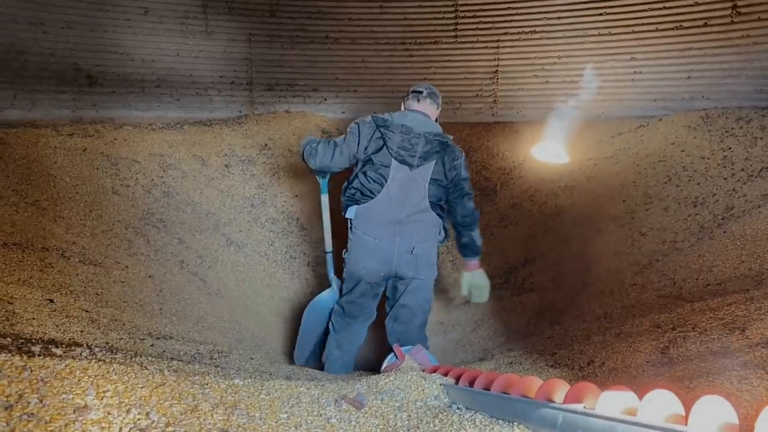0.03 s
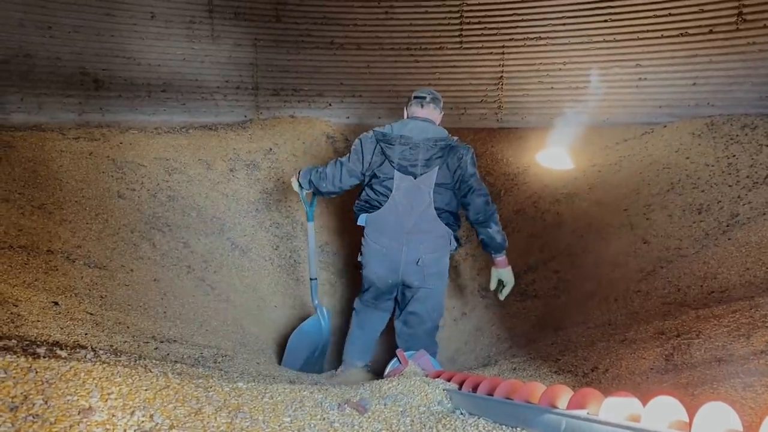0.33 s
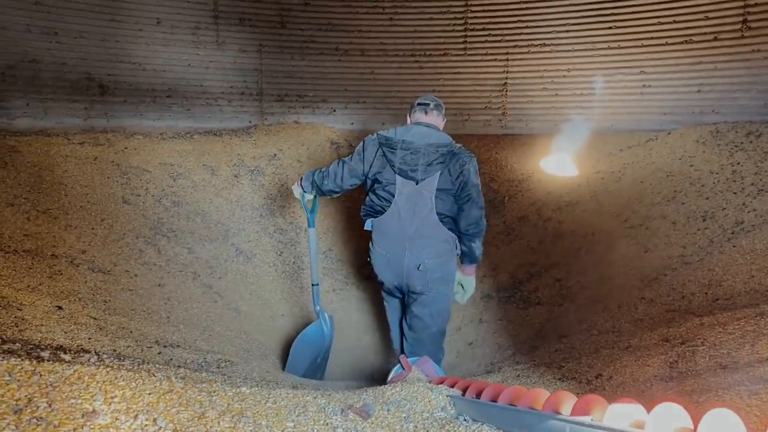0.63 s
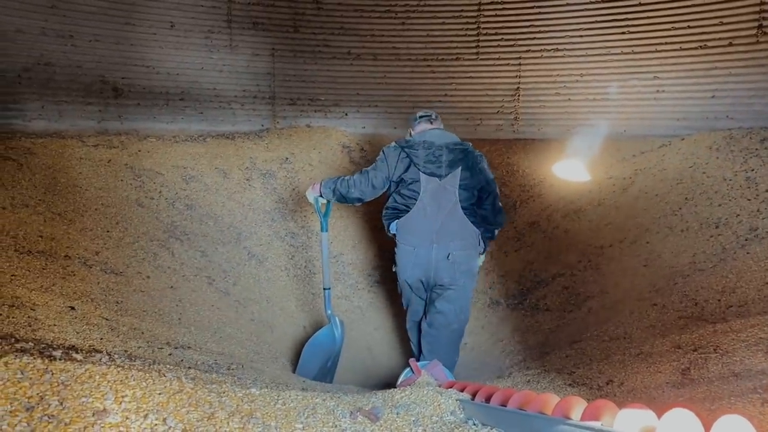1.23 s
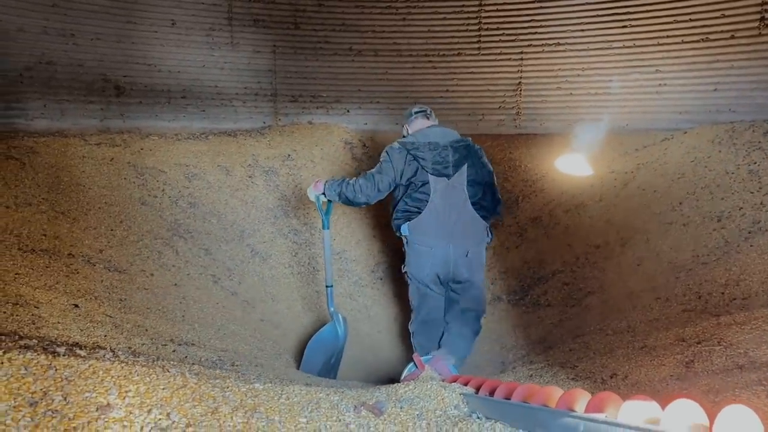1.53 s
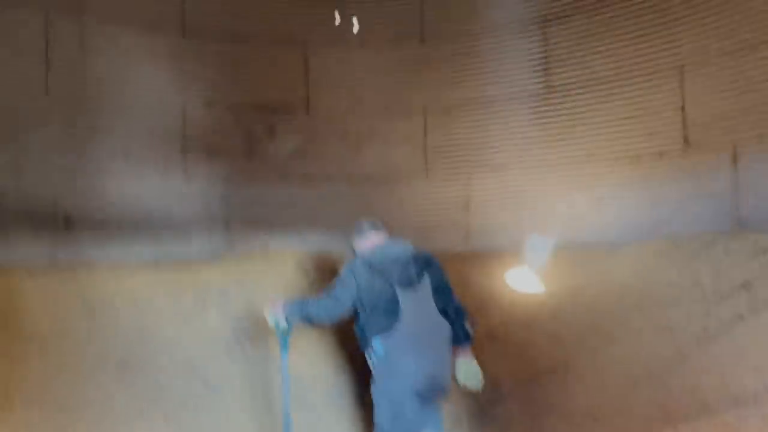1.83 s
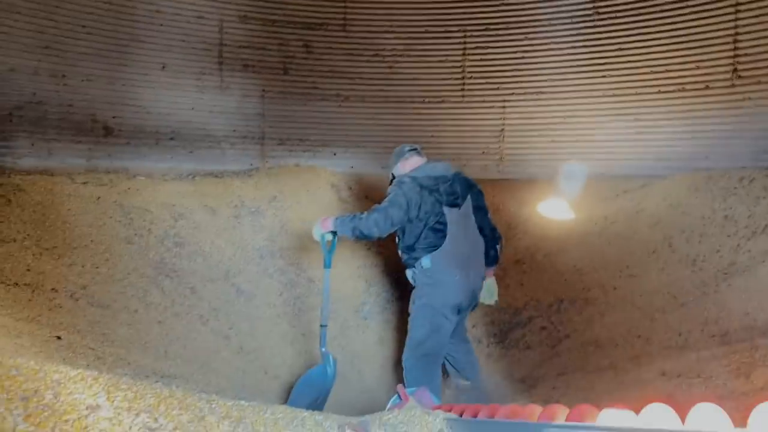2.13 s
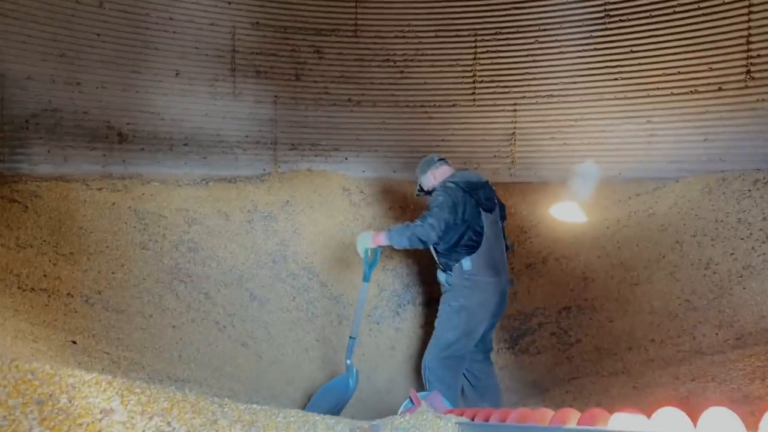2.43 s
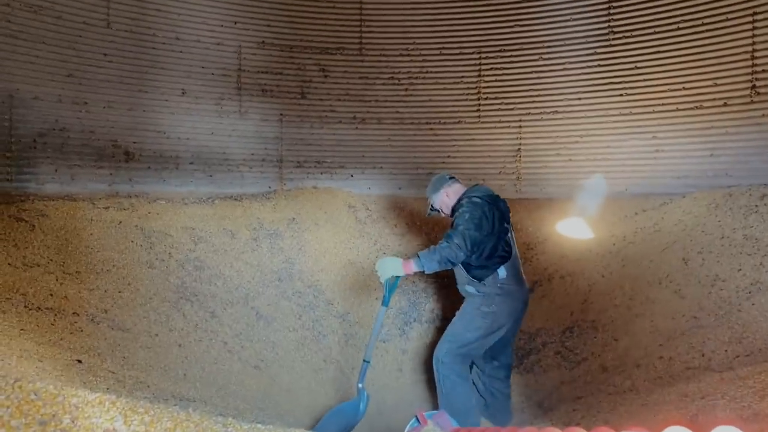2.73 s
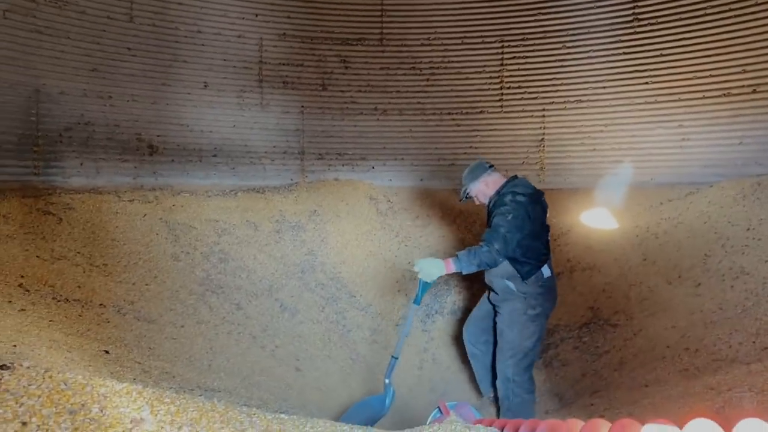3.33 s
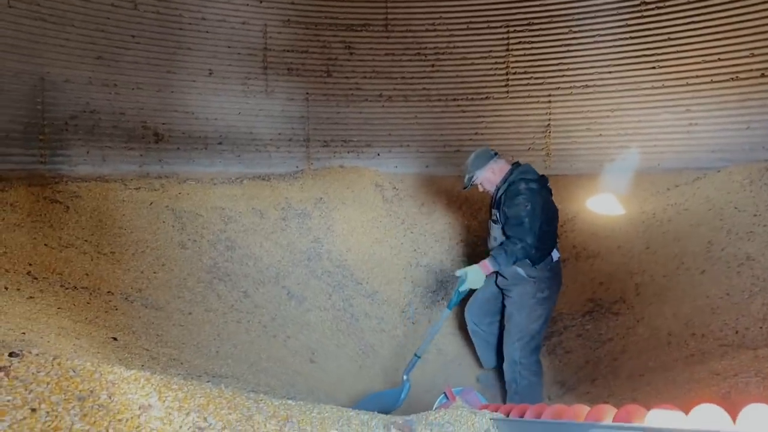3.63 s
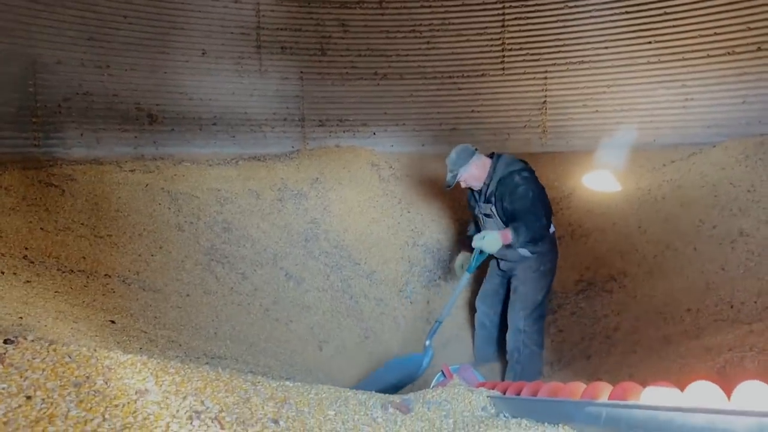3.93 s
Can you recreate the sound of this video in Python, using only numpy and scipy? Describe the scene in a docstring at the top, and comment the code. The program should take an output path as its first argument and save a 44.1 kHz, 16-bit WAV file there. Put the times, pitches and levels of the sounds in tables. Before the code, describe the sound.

Steady roar of a grain auger and droning fans, kernels hissing in an echoing metal bin.

```python
"""Sweep auger and fans in a round steel grain bin.

The fans give a throbbing drone, a low rumble with dull thumps and a broad roar that echoes between
the walls. Drives whine faintly; kernels pushed by the auger hiss and tick. Halfway, a hollow bin
resonance and the auger's rasp swell. The hand-held microphone colours the hiss near 6 kHz; its ports,
the right one most, ring brighter while cupped by the hand."""
import sys
import numpy as np
from scipy.fft import rfft, irfft
from scipy.io import wavfile
from scipy.ndimage import uniform_filter1d

SR = 44100
rng = np.random.default_rng(int(sys.argv[2]) if len(sys.argv) > 2 else 0)


def unload_wav(signal):
    """Save mono or channel-first audio to the path in sys.argv[1] as 16-bit WAV at rate SR, clipped to [-1, 1]."""
    wavfile.write(
        sys.argv[1],
        SR,
        np.round(np.clip(np.atleast_2d(signal).T, -1, 1) * 32767).astype(np.int16),
    )


N = 176400
HZ = np.maximum(np.arange(N // 2 + 1) * SR / N, 1)
RUMBLE_PAN_DB = -1.5

# Stereo field. Each row: frequency in Hz, left-right correlation.
FIELD_CORRELATION = [(60, 0.98), (150, 0.89), (300, 0.78), (600, -1.1), (2400, 0.22), (3200, -0.051),
                     (4300, 0.21), (5200, -0.1), (6200, 0.27), (8700, -0.32), (10000, 0.5), (15000, -0.17)]


def from_db(db):
    """Decibels to gain."""
    return 10 ** (np.asarray(db) / 20)


def rms_one(x):
    """Scale to unit power."""
    return x / np.sqrt(np.mean(x ** 2) + 1e-20)


def in_time(rows):
    """Join (s, value) rows by straight lines."""
    return np.interp(np.arange(N) / SR, *np.transpose(rows))


def over_hz(rows):
    """Interpolate each value column over log frequency."""
    hz, *columns = np.transpose(rows)
    return [np.interp(np.log(HZ), np.log(hz), column) for column in columns]


def shaped(x, gain):
    """Filter by a gain per frequency."""
    return irfft(rfft(x) * gain, N)


def per_hz(db):
    """Gain that brings unit white noise to a level in dB per Hz."""
    return from_db(db) * np.sqrt(SR / 2)


def resonance(hz, width_hz):
    """Gain of one resonance, peak 1."""
    return 1 / np.sqrt(1 + ((HZ ** 2 - hz ** 2) / (HZ * width_hz)) ** 2)


def pan(db):
    """Constant-power gains; db is left minus right."""
    gains = from_db(np.array([[.5], [-.5]]) * db)
    return gains / np.sqrt(np.mean(gains ** 2, axis=0))


def diffuse(pair, correlation_rows):
    """Mix two independent signals to a left-right correlation per frequency."""
    correlation = np.clip(over_hz(correlation_rows)[0], -.99, .99)
    mid = shaped(pair[0], np.sqrt((1 + correlation) / 2))
    side = shaped(pair[1], np.sqrt((1 - correlation) / 2))
    return np.array([mid + side, mid - side])


def turbulence():
    """White stereo noise with the set left-right correlation."""
    return diffuse(rng.standard_normal((2, N)), FIELD_CORRELATION)


def evened(x, samples):
    """Hold the running power near 1."""
    power = uniform_filter1d(uniform_filter1d(np.mean(x ** 2, axis=0), samples), samples)
    return x / np.sqrt(power + 1e-20)


def fan_drone(blade_gain_db=-5, hum_hz=144.6, hum_db=-37):
    """A blade tone sways in pitch and throbs about four times a second over an even, rough hum."""
    # Blade tone. Each row: time in seconds, pitch in Hz.
    pitch_hz = [(0, 134), (.3, 135.1), (.6, 132.2), (1.0, 133), (1.17, 122), (1.35, 132.1), (1.7, 130.7),
                (1.88, 136.4), (2.12, 127), (2.35, 134), (2.6, 132.6), (2.9, 135.8), (3.1, 127),
                (3.4, 131.2), (3.65, 135.1), (3.82, 127), (4, 132)]
    # Throb. Each row: time in seconds, relative level in dB.
    throb_db = [(0.0, -36), (0.06, -27), (0.52, -43), (0.69, -24.5), (0.86, -42.5), (0.93, -23),
                (1.06, -39), (1.13, -27), (1.34, -32.5), (1.47, -21), (1.55, -40), (1.73, -25), (1.8, -34),
                (1.88, -24.5), (2.02, -34), (2.13, -24), (2.29, -32.5), (2.41, -26), (2.58, -32),
                (2.65, -22), (2.78, -35.5), (2.96, -22.5), (3.11, -37), (3.21, -21), (3.5, -40),
                (3.66, -25), (3.71, -25.5), (3.79, -23), (3.88, -32), (3.99, -24)]
    cycles = np.cumsum(in_time(pitch_hz)) / SR + rng.random()
    blades = np.sqrt(2) * np.sin(2 * np.pi * cycles) * from_db(in_time(throb_db) + blade_gain_db)
    hum = evened(shaped(turbulence(), resonance(hum_hz, width_hz=24.4) ** 2), samples=1000)
    return (blades + hum * from_db(hum_db)) * pan(db=-5.5)


def rumble(top_hz=119.5, gain_db=-1):
    """The air in the bin heaves in low swells."""
    # Rumble spectrum. Each row: frequency in Hz, relative level in dB.
    spectrum = [(20, -80), (27, -81), (36, -67), (44, -51), (56, -47), (65, -50), (78, -47.5), (98, -49),
                (118, -47.5), (150, -42), (175, -68)]
    # Swells. Each row: time in seconds, relative level in dB.
    swell_db = [(0.0, -26.5), (0.26, -29.5), (0.32, -26), (0.39, -37), (0.46, -25.5), (0.53, -35.5),
                (0.6, -26), (0.73, -31), (0.79, -27), (0.88, -32.5), (1.27, -25.5), (1.39, -35.5),
                (1.51, -28.5), (1.69, -32), (1.84, -28), (1.98, -32.5), (2.11, -28), (2.37, -31),
                (2.52, -29), (2.59, -30), (2.73, -30.5), (2.89, -33), (3.21, -27.5), (3.76, -32.5),
                (3.82, -22.5), (3.88, -36), (3.93, -25), (3.99, -36)]
    colour = from_db(over_hz(spectrum)[0]) / np.sqrt(1 + (HZ / top_hz) ** 10)
    air = evened(shaped(turbulence(), colour), samples=2400)
    return air * from_db(in_time(swell_db) + gain_db) * pan(RUMBLE_PAN_DB)


def steel_bin(x, paths=8, t60_s=1.36, echo_db=-5):
    """Steady sound circles between the steel walls on several paths a side."""
    echoes = 0
    for k, path_s in enumerate(rng.uniform(.015, .06, (paths, 2, 1))):
        loop = from_db(-60 * path_s / t60_s) * np.exp(-2j * np.pi * HZ * path_s)
        echoes = echoes + (-1) ** k * loop / (1 - loop)
    echoes = echoes / np.sqrt(np.mean(np.abs(echoes) ** 2))
    return rms_one(shaped(x, 1 + from_db(echo_db) * echoes))


def roar(low_hz=143, high_hz=2330, gain_db=0.58, right_lag_s=0.00051, churn_top_hz=830):
    """Broad fan and auger noise rings in the bin; its lower part churns as the microphone moves."""
    # Roar spectrum. Each row: frequency in Hz, base level in dB per Hz, left minus right in dB.
    spectrum = [(189, -57, -9), (203, -61, -6), (279, -56.5, -5), (368, -61.5, -4), (430, -59.0, -12),
                (550, -62.5, 0.5), (704, -62, -6.5), (840, -61, -5), (1320, -65.5, -7), (1610, -64.5, -0.7),
                (2410, -71.5, -3)]
    # Roar field before the lag. Each row: frequency in Hz, left-right correlation.
    correlation = [(170, 0.94), (260, 0.93), (400, 0.67), (600, 0.15), (900, 0.46), (1300, -0.23),
                   (1650, -0.25), (2000, -0.23), (2400, 0.5)]
    # Churn. Each row: time in seconds, gain in dB.
    churn_db = [(0, -0.4), (.3, 0), (.5, -2), (.75, 0), (1.25, .5), (1.4, -1), (1.8, -0.5), (2.25, -1),
                (2.52, 2), (2.7, 0.7), (3.1, 1), (3.45, 0), (3.65, -0.3), (4, 1)]
    db, pan_db = over_hz(spectrum)
    band = 1 / np.sqrt((1 + (low_hz / HZ) ** 20) * (1 + (HZ / high_hz) ** 10))
    lag = np.exp(-2j * np.pi * HZ * right_lag_s * np.array([[0], [1]]))
    field = diffuse(steel_bin(rng.standard_normal((2, N))), correlation)
    air = shaped(field, per_hz(db + gain_db) * band * pan(pan_db) * lag)
    lows = shaped(air, 1 / (1 + (HZ / churn_top_hz) ** 10))
    return air - lows + lows * from_db(in_time(churn_db))


def drive_whines():
    """Faint, wavering tones of motors and gears."""
    # Each row: pitch in Hz, half-width of each of two filter stages in Hz, level in dB.
    tones = [(357.6, 2.2, -48), (369, 0.69, -49.5), (633, 4.6, -64), (1160, 84, -51), (2553, 28, -49.5)]
    out = 0
    for hz, half_width_hz, db in tones:
        tone = rms_one(shaped(turbulence(), resonance(hz, 2 * half_width_hz) ** 2))
        out = out + from_db(db) * tone
    return out * pan(db=-4.5)


def trickling(x, bands=7, flicker_top_hz=16, depth_db=1):
    """Each treble band swells and sinks a little on its own."""
    log_centres = np.log(np.geomspace(2500, 14000, bands))
    out = 0
    for weights in np.eye(bands):
        swell = rms_one(shaped(rng.standard_normal(N), 1 / (1 + (HZ / flicker_top_hz) ** 4)))
        band = shaped(x, np.interp(np.log(HZ), log_centres, weights))
        out = out + band * from_db(depth_db * swell)
    return out


def grain(ticks_per_s=4000, spread_db=2.5, tick_low_hz=7500, top_tick_share=0.29):
    """Near kernels tick brightly over the smooth hiss of the sliding mass."""
    # Kernel spectrum. Each row: frequency in Hz, level in dB per Hz.
    spectrum = [(1500, -77), (2300, -71.5), (3000, -68.5), (4000, -65.5), (5200, -65), (6500, -63.5),
                (8000, -69.5), (10000, -72.5), (11200, -80), (14000, -80), (15300, -79)]
    # Grain flow. Each row: time in seconds, gain in dB.
    flow_db = [(0, 0.3), (.4, 0.4), (1.1, -0.04), (1.6, 0.1), (2.7, -0.1), (3.3, 0), (4, .5)]
    hits = rng.random((2, N)) < ticks_per_s / SR
    sizes = from_db(spread_db * np.minimum(rng.exponential(1, (2, N)), 5))
    signs = rng.choice([-1, 1], (2, N))
    impacts = diffuse(rms_one(hits * sizes * signs), FIELD_CORRELATION)
    tick_share = top_tick_share / (1 + (tick_low_hz / HZ) ** 4)
    colour = per_hz(over_hz(spectrum)[0])
    ticks = shaped(impacts, colour * np.sqrt(tick_share))
    hiss = shaped(turbulence(), colour * np.sqrt(1 - tick_share))
    return trickling(ticks + hiss) * from_db(in_time(flow_db))


def thumps(attack_s=.005, t60_s=0.095):
    """Dull bumps stand out of the rumble; each dies within a few cycles."""
    # Each row: start in seconds, gain in dB, pitch in Hz.
    bumps = [(0.045, -14, 120), (0.579, -12, 78.5), (1.103, -13.5, 96.2), (1.494, -17, 78.8),
             (2.101, -30, 75), (3.251, -10, 125.3), (3.801, -14.5, 135)]
    out = 0
    for start_s, db, hz in bumps:
        age_s = np.maximum(np.arange(N) / SR - start_s, 0)
        envelope = (1 - np.exp(-age_s / attack_s)) * from_db(-60 * age_s / t60_s)
        out = out + from_db(db) * envelope * np.sin(2 * np.pi * hz * age_s)
    return out * pan(RUMBLE_PAN_DB)


def hollow_resonance(hz=695, width_hz=220, correlation=-.1):
    """A hollow resonance of the bin swells as the microphone moves."""
    # Each row: time in seconds, level in dB.
    swell_db = [(0, -68), (1.7, -60), (2.05, -38.5), (2.2, -43), (2.5, -35.5), (2.75, -51), (3.1, -59),
                (3.5, -43), (4, -48)]
    field = diffuse(rng.standard_normal((2, N)), [(hz, correlation)])
    ring = evened(shaped(field, resonance(hz, width_hz) ** 2), samples=4400)
    return ring * from_db(in_time(swell_db)) * pan(db=-2)


def auger_rasp(hz=1370, width_hz=480):
    """The flighting rasps, in phase at both ports, louder once the microphone faces the auger."""
    # Each row: time in seconds, level in dB.
    swell_db = [(0, -62), (2.0, -59), (2.8, -44), (3.3, -46), (4, -45)]
    rasp = rms_one(shaped(rng.standard_normal(N), resonance(hz, width_hz) ** 2))
    return rasp * from_db(in_time(swell_db)) * pan(db=4)


def port(x, resonances):
    """A microphone port lifts the treble around its resonances."""
    added_power = sum((from_db(db) * resonance(hz, width_hz)) ** 2 for hz, width_hz, db in resonances)
    return shaped(x, np.sqrt(1 + added_power))


def scene():
    """Fans and auger run together without pause."""
    fans = fan_drone() + rumble() + thumps() + roar()
    return fans + hollow_resonance() + auger_rasp() + drive_whines() + grain()


def record(dry):
    """Two ports colour the sound; cupping adds ringing and shades the high treble; the top is cut."""
    # Open-port resonances. Each row: frequency in Hz, width in Hz, gain in dB.
    left_port = [(5890, 1050, 8.5), (5940, 240, 1.5)]
    right_port = [(7250, 2600, -0.5), (5800, 400, -9)]
    # Resonances added by the hand; same columns.
    left_hand = [(6100, 280, 4.5), (7100, 600, 0)]
    right_hand = [(5840, 520, 4), (7180, 690, 4.5), (8090, 360, 11.5)]
    # Hand over the ports. Each row: time in seconds, cupped share from 0 to 1.
    cupping = [(0, 1), (1.25, 1), (1.57, 0.67), (1.68, 0), (3.2, 0.04), (3.9, 0.18)]
    shade_hz, shade_db, cutoff_hz = 10700, -2.5, 15300
    uncovered = np.array([port(dry[0], left_port), port(dry[1], right_port)])
    cupped = np.array([port(dry[0], [*left_port, *left_hand]),
                       port(dry[1], [*right_port, *right_hand])])
    cupped = shaped(cupped, from_db(shade_db / (1 + (shade_hz / HZ) ** 20)))
    share = in_time(cupping)
    blend = (1 - share) * uncovered + share * cupped
    return shaped(blend, 1 / np.sqrt(1 + (HZ / cutoff_hz) ** 200))


dry = scene()
out = record(dry)
unload_wav(out)
```